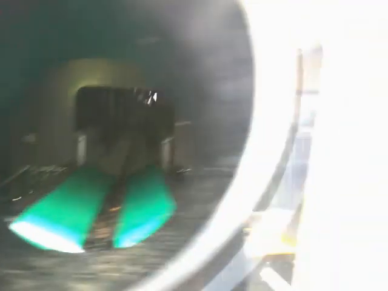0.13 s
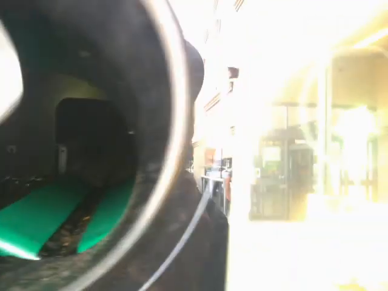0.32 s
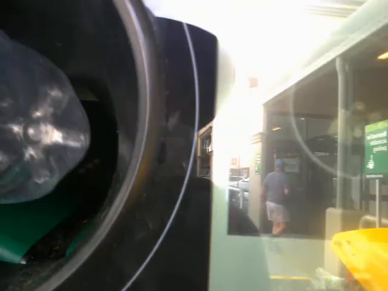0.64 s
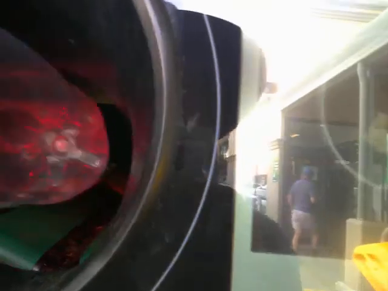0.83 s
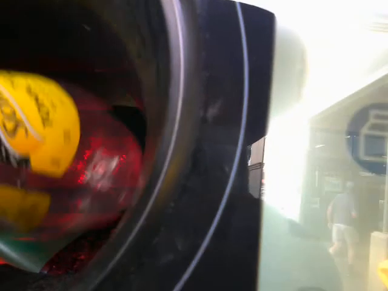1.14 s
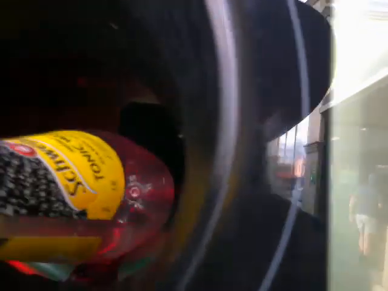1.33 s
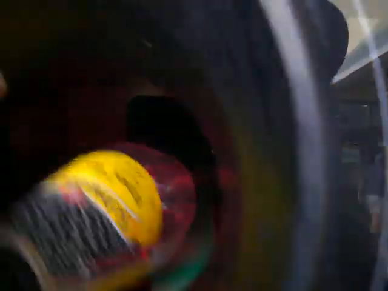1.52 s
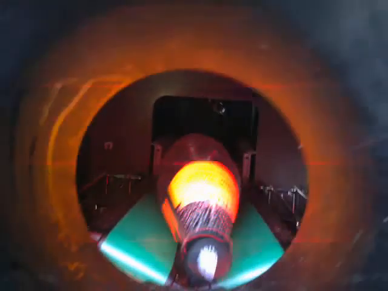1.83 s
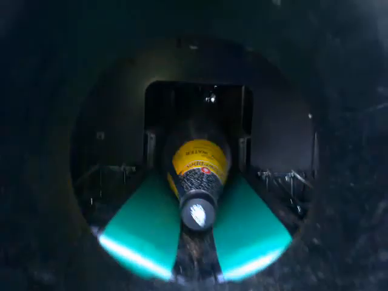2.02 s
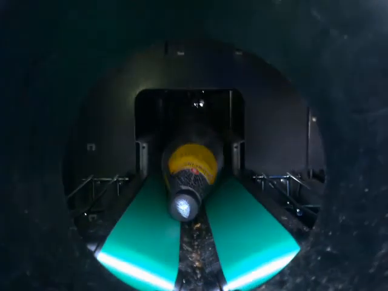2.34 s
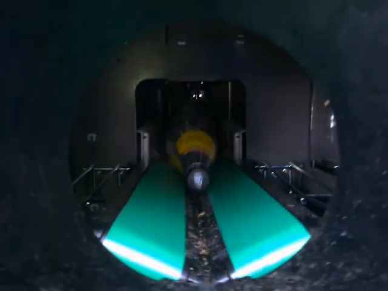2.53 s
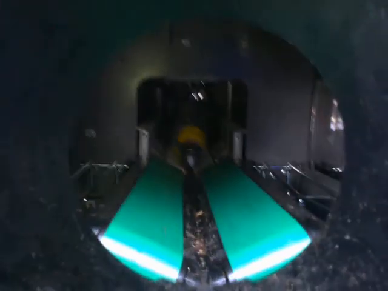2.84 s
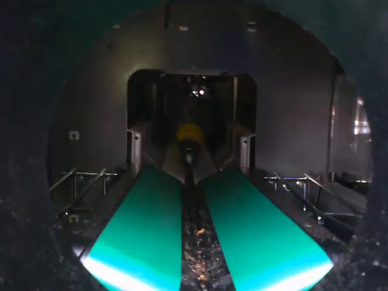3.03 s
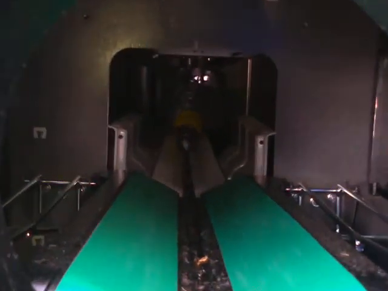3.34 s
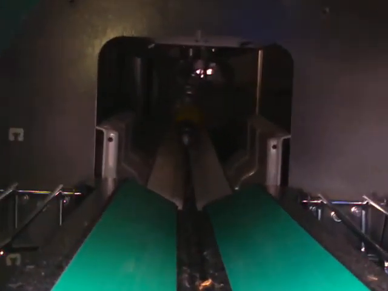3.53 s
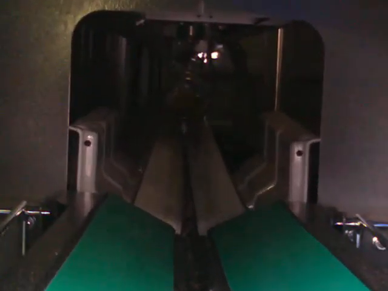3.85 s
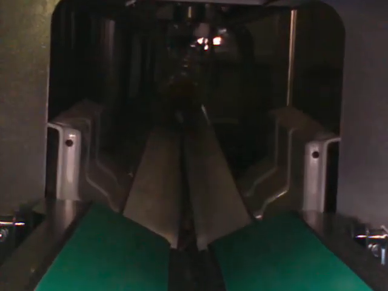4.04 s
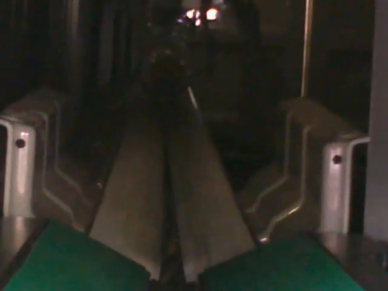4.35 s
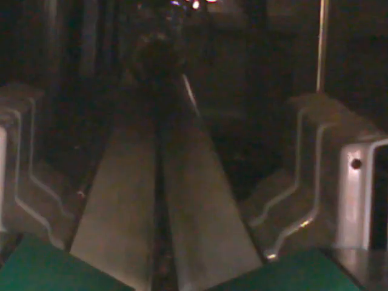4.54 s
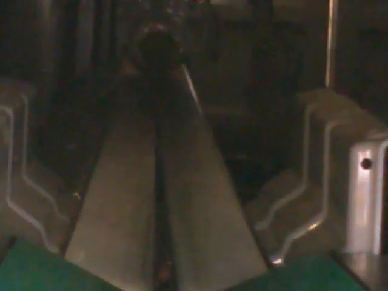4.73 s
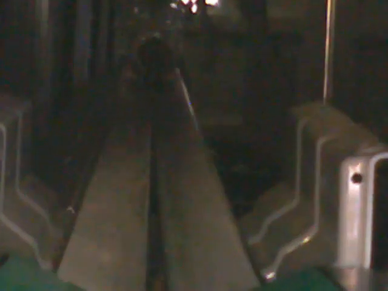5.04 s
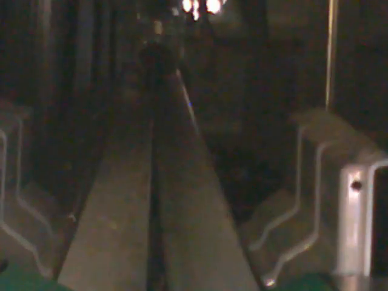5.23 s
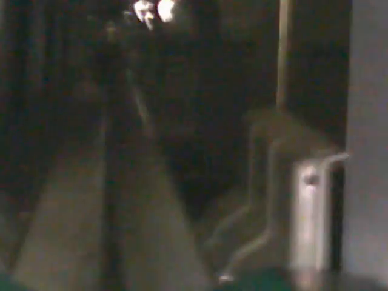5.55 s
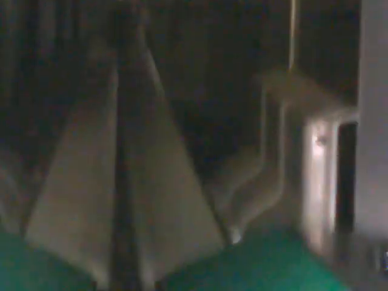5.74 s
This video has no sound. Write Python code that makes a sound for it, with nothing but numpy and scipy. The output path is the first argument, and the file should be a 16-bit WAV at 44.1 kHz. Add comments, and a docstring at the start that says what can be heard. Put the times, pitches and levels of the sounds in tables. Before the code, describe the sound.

Muffled handling thuds, then a hollow plastic bottle knocks sharply into a return machine and conveyor belts rumble, clatter and rattle it away.

```python
"""At a shop front, a plastic bottle is pushed into the mouth of a bottle return machine.
The hollow bottle and the mouth panel ring as decaying modes when it knocks; the thin wall crinkles in noise.
Belts start and carry it in: banded rumble and clatter, wavering drive tones, and rattles ringing the frame.
Fingers bump, tick and rub on the hand-held recorder, whose half-covered microphone muffles the treble.
Behind lie far traffic, a cooling fan and microphone hiss."""
import sys
import numpy as np
from scipy import signal
from scipy.io import wavfile

SR = 44100
rng = np.random.default_rng(int(sys.argv[2]) if len(sys.argv) > 2 else 0)


def store_wav(level_fs):
    """Save 16-bit WAV to argv[1]."""
    pcm = np.round(np.clip(np.atleast_2d(level_fs), -1, 1) * 32767)
    wavfile.write(sys.argv[1], SR, pcm.T.astype(np.int16))


def linear_from_db(decibels):
    """Turn decibels (scalar or array-like) into linear amplitude factors; 0 gives 1."""
    return 10 ** (np.asarray(decibels, float) / 20)


N = 260328


def rms_one(x):
    """Scale to rms 1."""
    return x / np.sqrt(np.mean(x ** 2) + 1e-20)


def in_time(rows):
    """Columns in dB at every sample, fading in before the first row and out after the last."""
    row_s, *columns = np.transpose(rows)
    row_s = np.r_[row_s[0] - .05, row_s, row_s[-1] + .05]
    t = np.arange(N) / SR
    return [np.interp(t, row_s, np.r_[-110, column, -110]) for column in columns]


def drift(rate_hz):
    """Slow random wander of rms 1: noise through two equal poles, computed every 40 samples."""
    pole = np.exp(-80 * np.pi * rate_hz / SR)
    noise = rng.standard_normal(N // 40 + 2002)
    slow = signal.lfilter([1], [1, -2 * pole, pole * pole], noise)[2000:]   # drop the settling
    return np.interp(np.arange(N) / 40, np.arange(len(slow)), rms_one(slow))


def ring(x, hz, t60_s):
    """A damped resonance: a unit click sets a sine of height 1 ringing."""
    pole = linear_from_db(-60 / (max(t60_s, .001) * SR))
    angle = 2 * np.pi * hz / SR
    return signal.lfilter([0, np.sin(angle)], [1, -2 * pole * np.cos(angle), pole * pole], x + 1e-18)


def band(x, low_hz, high_hz, order=2):
    """Butterworth band-pass."""
    return signal.sosfilt(signal.butter(order, [low_hz, high_hz], "band", fs=SR, output="sos"), x)


def soft(force, cut_hz, order=5):
    """A yielding contact, heard through the covered port, passes little treble."""
    return signal.sosfilt(signal.butter(order, cut_hz, fs=SR, output="sos"), force)


def add(out, start_s, sound, peak_db):
    """Lay a short sound into out with the given peak."""
    at = max(round(start_s * SR), 0)
    sound = sound[:N - at]
    out[at:at + len(sound)] += sound * linear_from_db(peak_db) / np.abs(sound).max()


def banded_noise(spectrum, patchy_db, rate_hz):
    """Third-octave noise bands that flicker partly together, partly alone; rms 1."""
    hz, db = np.transpose(spectrum)
    out, together, white = 0, drift(rate_hz), rng.standard_normal((2, N))
    edges_hz = hz[0] * 2 ** np.arange(0, np.log2(min(hz[-1], 19000) / hz[0]), 1 / 3)
    for k, (low_hz, high_hz) in enumerate(zip(edges_hz, edges_hz[1:])):
        level_db = np.interp(np.log(low_hz * high_hz) / 2, np.log(hz), db)
        flicker_db = patchy_db * (together + 0.45 * drift(rate_hz))
        out = out + linear_from_db(level_db + flicker_db) * band(white[k % 2], low_hz, high_hz, order=3)
    return rms_one(out)


def hum(hz, rms_db, width_hz):
    """A wavering tone: noise through a narrow resonance."""
    return linear_from_db(rms_db) * rms_one(ring(rng.standard_normal(N), hz, 2.2 / width_hz))


def strike(modes, contact, spread_db, tilt_db=0):
    """A contact force rings every mode, with strengths of its own for this blow."""
    gains = linear_from_db(np.transpose(modes)[1] + tilt_db + spread_db * rng.standard_normal(len(modes)))
    return sum(gain * ring(contact, hz, t60_s) for gain, (hz, _, t60_s) in zip(gains, modes))


def chatter(decay_s, touches_per_s, size=6000):
    """One firm touch, then uneven random ones dying away."""
    t = np.arange(size) / SR
    touches = rng.random(size) < touches_per_s / SR
    force = touches * rng.standard_normal(size) * np.exp(-t / decay_s)
    force[0] = 1.6
    return force


def bottle():
    """Hollow bumps on the chute, sharp knocks on the mouth, and the thin wall crinkling."""
    # Bumps on the chute. Each row: start in seconds, peak in dB ahead of the tunnel's tail.
    bump_rows = [(0.721, -30.5), (0.789, -13.5), (1.005, -31.5), (1.05, -22.5), (1.099, -20), (1.137, -28),
                 (1.217, -20.5)]
    # Modes of the hollow bottle. Each row: frequency in Hz, usual strength in dB, t60 in seconds.
    bottle_modes = [(167.6, 0.5, 0.27), (291.5, -5.5, 0.082), (352, 11.5, 0.07), (485, 6, 0.059),
                    (543, 7, 0.067), (728, 12, 0.011), (880, -7, 0.075), (1180, 2.5, 0.028),
                    (1470, -16, 0.17), (1733, -52, .08), (3360, -19, .03)]
    # Knocks on the mouth. Each row: start in seconds, peak in dB ahead of the tunnel's tail,
    # share of the free ring time, brightness in dB per octave.
    knock_rows = [(1.7543, -4, 0.62, -10.5), (1.8187, -9, 0.45, 1.5), (2.592, -21, 1.24, -6),
                  (2.906, -19.5, 1.1, -14), (2.958, -31, 0.99, -13)]
    # Modes of the mouth panel. Each row: frequency in Hz, usual strength in dB, free t60 in seconds.
    mouth_modes = [(780, -15, 0.021), (880, -7, 0.06), (904, 7.5, 0.088), (890, -11, 0.056),
                   (1340, -3, 0.056), (1760, 5, 0.024), (1780, -13, 0.068), (1970, -25, 0.064),
                   (2460, -27, 0.082), (2680, -19, 0.1), (2750, -8, 0.051), (4740, -8, .025)]
    out, click = np.zeros(N), np.eye(1, 6000)[0]
    for s, db in bump_rows:
        force = soft(chatter(.014, 500), cut_hz=2100, order=4)
        add(out, s + .0015, strike(bottle_modes, force, spread_db=2), db)
    for s, db, share, bright_db in knock_rows:
        modes = np.array(mouth_modes) * [1, 1, share]
        tilt_db = bright_db * np.log2(modes[:, 0] / 900)
        force = soft(click, cut_hz=2300, order=4)
        add(out, s, -strike(modes, force, spread_db=1, tilt_db=tilt_db), db)
    snaps = rng.standard_normal(N) * linear_from_db(2.0 * drift(60))
    high, low = band(snaps, 6500, 12000), band(snaps, 2500, 3300)
    crinkle = band(snaps, 4100, 5030, order=3) + linear_from_db(-18) * high + linear_from_db(-2) * low
    return tunnel(out) + crinkling() * rms_one(crinkle)


def tunnel(x):
    """The sheet-metal tunnel answers with a short dense tail, mostly in the upper middle."""
    t = np.arange(round(.2 * SR)) / SR
    tail = band(rng.standard_normal(len(t)), 1100, 5000)
    tail = tail * linear_from_db(-60 * t / .14) * (t > .003)   # t60 0.14 s
    return x + linear_from_db(-8) * signal.fftconvolve(x, tail / np.linalg.norm(tail))[:N]


def crinkling():
    """Level of the crinkle: a swell for each row over a faint bed that fades as the bottle slides away."""
    # Swells. Each row: time of peak in seconds, level in dB, rise and fall over 20 dB in seconds.
    swell_rows = [(0.724, -68.5, .013, .018), (0.798, -69, 0.034, 0.06), (1.07, -61.5, 0.04, 0.019),
                  (1.364, -60.5, 0.029, 0.01), (1.396, -66.5, 0.0066, 0.056), (1.446, -66, 0.054, 0.064),
                  (1.66, -74, 0.12, .08), (1.767, -51.5, 0.0065, 0.027), (1.822, -70, 0.016, .04)]
    slide_start_s, slide_start_db, fade_db_per_s = 0.94, -82.5, 4.0
    t = np.arange(N) / SR
    level = linear_from_db(slide_start_db - fade_db_per_s * (t - slide_start_s)) * (t > slide_start_s)
    for s, db, rise_s, fall_s in swell_rows:
        level = level + linear_from_db(db - 20 * np.where(t < s, (s - t) / rise_s, (t - s) / fall_s))
    return level


def belts():
    """Rollers rumble and the drive hums with them; loose parts clatter, the belt whirrs at the top."""
    # Belts running, their loudness rising and falling. Each row: time in seconds, rumble level in dB,
    # clatter level in dB.
    belt_rows = [(0.7, -48, -57.5), (0.95, -54, -60), (1.06, -44, -45), (1.2, -43, -50.5),
                 (1.45, -39.5, -43.5), (1.93, -45.5, -48.5), (2.15, -44.5, -48.5), (2.39, -47, -53.5),
                 (2.65, -41.5, -47.5), (2.92, -42.5, -45.5), (3.12, -47, -49.5), (3.47, -41, -40.5),
                 (3.72, -43.5, -46.5), (4.05, -39, -44), (4.28, -42.5, -44.5), (4.6, -40, -46),
                 (5.1, -43.5, -46), (5.42, -41, -42), (5.9, -48, -49.5)]
    # Whirr, heard best with the recorder inside the mouth. Each row: time in seconds, level in dB.
    whirr_rows = [(0.0, -61.5), (0.14, -65), (0.22, -95), (0.9, -87), (1.35, -87), (1.7, -83),
                  (1.95, -63.5), (2.35, -62.5), (2.65, -79.5), (3.0, -79), (3.45, -59), (4.8, -62),
                  (5.55, -65), (5.9, -77)]
    # Wavering drive tones. Each row: frequency in Hz, level in dB against the rumble.
    motor_rows = [(150.7, -7), (301.5, -9), (339.1, -11), (419.9, -12.5), (554.5, -30), (845.2, -10.5)]
    # Noise spectra. Each row: frequency in Hz, relative density in dB per Hz.
    rumble_spectrum = [(15, -46), (25, -24), (155, -3), (307, -7.5), (376, -23), (634, 0), (702, -25.5),
                       (800, -17), (1040, -47.5), (1760, -120)]
    clatter_spectrum = [(320, -35), (550, 5), (647, 3.5), (718, -10.5), (835, 6.5), (1010, -4), (1190, 6),
                        (1730, 0.5), (2200, -18.5), (2860, -55), (4840, -120)]
    rumble_db, clatter_db = in_time(belt_rows)
    whirr_db, = in_time(whirr_rows)
    motor = sum(hum(hz, db, width_hz=16) for hz, db in motor_rows)
    rumble = linear_from_db(rumble_db) * (banded_noise(rumble_spectrum, patchy_db=1.35, rate_hz=36) + motor)
    clatter = linear_from_db(clatter_db) * banded_noise(clatter_spectrum, patchy_db=3.5, rate_hz=26)
    whirr = rms_one(band(rng.standard_normal(N), 1600, 3600))
    top = clatter + linear_from_db(whirr_db + 2.0 * drift(25)) * whirr
    edge = signal.cheby2(10, 30, 2830, fs=SR, output="sos")   # 30 dB down above 2830 Hz
    return rumble + signal.sosfilt(edge, top)


def rattles():
    """Each rattle is a short chatter into the frame, strongest near its own pitch, with a scuff of hiss."""
    # Louder rattles in the belt frame. Each row: start in seconds, peak in dB, favoured pitch in Hz.
    rattle_rows = [(1.03, -32, 1240), (1.343, -26, 880), (1.647, -26, 1060), (1.907, -33.5, 1780),
                   (1.92, -35.5, 1770), (1.986, -33, 1340), (2.13, -30, 1100), (2.505, -30.5, 850),
                   (2.551, -25, 907), (2.98, -33, 870), (3.052, -22.5, 1670), (3.342, -27, 1096),
                   (3.403, -20, 1710), (3.454, -25, 1080), (3.563, -30, 1380), (3.733, -27, 1060),
                   (3.857, -25, 1710), (3.914, -23, 1480), (4.022, -27.5, 1070), (4.102, -30.5, 1290),
                   (4.418, -22, 1120), (4.553, -25.5, 1410), (4.702, -24, 1140), (4.816, -29.5, 805),
                   (4.923, -26, 1710), (5.04, -28, 1080), (5.24, -27, 1720), (5.266, -22.5, 1710),
                   (5.321, -23, 1090)]
    # Modes of the belt frame. Each row: frequency in Hz, usual strength in dB, t60 in seconds.
    frame_modes = [(816, -4, 0.078), (924.4, -1.5, 0.099), (1107, -8, 0.17), (1201, 7, 0.028),
                   (1350, -1, 0.094), (1476, 1, 0.073), (1710, 0.5, 0.055), (1698, 4.5, 0.015),
                   (2212, 3.5, 0.032), (2770, -23.5, 0.073), (2900, -39, .08)]
    # Brighter scuffs of plastic on the belts. Each row: start in seconds, peak in dB, centre in Hz.
    scuff_rows = [(1.92, -55.5, 3300), (1.973, -56.5, 2900), (2.12, -71, 4800), (2.495, -65, 4500),
                  (2.55, -56, 4500), (3.052, -59.5, 4000), (3.338, -61.5, 3900), (5.262, -53.5, 3900),
                  (5.483, -75, 4200)]
    hiss_db, hiss_hz = -49, 4200   # hiss peak against the rattle's
    out, t = np.zeros(N), np.arange(6000) / SR
    rows = rattle_rows + teeth()
    for s, db, hz in rows:
        near_db = -5.0 * np.abs(np.log2(np.array(frame_modes)[:, 0] / hz))
        force = soft(chatter(0.017, 1500), cut_hz=1900)
        add(out, s, strike(frame_modes, force, spread_db=3, tilt_db=near_db), db)
    hisses = [(s, db + hiss_db, hiss_hz) for s, db, hz in rows]
    for s, db, hz in scuff_rows + hisses:
        scuff = band(rng.standard_normal(len(t)), hz / 1.27, hz * 1.15)
        add(out, s, scuff * np.sqrt(t) * np.exp(-(t / 0.021) ** 2), db)
    return out


def teeth():
    """Every tooth of the drive wheel shakes the frame a little: rattle rows, each with its own pitch."""
    # Nine teeth in turn. Each entry: usual peak in dB.
    tooth_db = [-44, -42, -48, -46.5, -37, -38, -38.5, -37, -46.5]
    first_s, last_s, period_s = 1.034, 5.86, .0564
    spread_db, jitter_s = 2.2, .003
    s = np.arange(first_s, last_s, period_s)
    late, strong, pitch = rng.standard_normal((len(s), 3)).T
    db = np.resize(tooth_db, len(s)) + spread_db * strong
    return list(zip(s + jitter_s * late, db, 1150 * 2 ** (.3 * pitch)))


def handling():
    """Bumps swing the diaphragm, the casing ticks, dragging skin slips in dense clicks."""
    # Fingers bump the recorder. Each row: start in seconds, peak in dB, swing in Hz, t60 in seconds,
    # push 1 or pull -1.
    thump_rows = [(0.014, -29.5, 86, 0.058, 1), (0.0565, -5, 105, 0.017, 1), (0.07, -7.5, 94, 0.051, -1),
                  (0.095, -22.5, 266, 0.049, 1), (.134, -22.5, 261, 0.05, -1),
                  (2.214, -17.5, 77.5, 0.045, -1), (2.383, -29.5, 85, 0.13, -1),
                  (2.4, -22.5, 72, 0.085, -1), (2.422, -20.5, 147, 0.047, 1), (2.45, -25.5, 71, 0.056, -1),
                  (2.669, -25.5, 96, 0.066, -1), (2.828, -20, 130, 0.044, -1), (2.845, -9, 93, 0.054, 1),
                  (2.879, -14.5, 104, 0.017, -1), (2.9106, -7.5, 98, 0.025, 1),
                  (2.9332, -9.5, 93, 0.009, 1), (5.53, -4, 100.7, 0.032, 1), (5.552, -23, 142, 0.12, 1),
                  (5.576, -10, 68.6, 0.0095, 1), (5.598, -26, 244, 0.11, 1), (5.618, -22.5, 247, 0.079, -1),
                  (5.697, -9.5, 86, 0.018, -1), (5.746, -24, 128, 0.031, -1)]
    # Hard ticks, on the casing or where the bottle meets the chute. Each row: start in seconds,
    # peak in dB, ring in Hz, treble peak in dB, t60 in cycles of the ring.
    tick_rows = [(0.008, -30.5, 1760, -65, 20), (0.03, -20.5, 1500, -47.5, 1.5),
                 (0.055, -17.5, 947, -40.5, 7.2), (0.074, -3.5, 1050, -45.5, 8),
                 (0.0745, -25, 1500, -34, 4.1), (0.79, -22.5, 1500, -45, 32), (1.102, -40, 880, -51, 4.8),
                 (1.215, -38, 1220, -60, 6), (1.755, -24, 921, -31, 1), (2.213, -29, 1300, -64, 17),
                 (2.29, -21.5, 2100, -60.5, 6.8), (2.301, -16, 1820, -57.5, 1.4),
                 (2.359, -14.5, 929, -52.5, 0.74), (2.385, -15.5, 1600, -61.5, 6.9),
                 (2.403, -18, 1030, -47.5, 4), (2.671, -11, 918, -39.5, 2.1), (2.827, -5, 902, -36.5, 3.7),
                 (2.844, -4, 900, -38.5, 2.9), (2.8465, -7.5, 700, -43, 0.72),
                 (2.879, -29, 1300, -55.5, 2.4), (2.910, -4, 1100, -42.5, 0.95),
                 (2.9336, -11.5, 1300, -53, 0.65), (5.503, -19, 943, -44.5, 1.2),
                 (5.53, -13, 1500, -51, 1.5), (5.533, -14, 939, -48.5, 1.8), (5.555, -8, 902, -31.5, 0.87),
                 (5.575, -22, 910, -43, 3.5), (5.699, -22.5, 1180, -51.5, 5), (5.722, -22, 1540, -62, 12),
                 (5.744, -24.5, 1520, -65, 4.8)]
    # Skin drags over the casing. Each row: start in seconds, length in seconds, peak in dB,
    # centre in Hz, treble gain in dB.
    rub_rows = [(0.024, 0.064, -24.5, 850, -33), (0.065, 0.016, -11, 870, -28),
                (0.084, 0.021, -40, 1190, -35.5), (2.396, 0.054, -21, 1574, -31),
                (2.827, 0.0093, -21.5, 875, -36), (2.838, 0.016, -19.5, 1000, -22),
                (2.857, 0.017, -35, 1200, -26), (2.915, 0.013, -32, 860, -41),
                (5.538, 0.042, -24.5, 806, -44.5), (5.565, 0.016, -13, 980, -34),
                (5.699, 0.057, -33, 1500, -24.5)]
    out, click = np.zeros(N), np.eye(1, 6000)[0]
    for s, db, hz, t60_s, way in thump_rows:
        shove = signal.lfilter([1, -1], [1, -.96], click)   # a quick shove starts the swing
        push = soft(shove, cut_hz=1380, order=3)
        casing = linear_from_db(-18.5) * ring(push, 299.0, 0.012)   # the case flexes briefly
        add(out, s, way * (ring(push, hz, t60_s) + casing), db)
    for s, db, hz, treble_db, cycles in tick_rows:
        add(out, s + .001, -ring(soft(click, cut_hz=2380), hz, cycles / hz), db)
        crack = chatter(0.0003, 12000, size=600)
        crack = band(crack, 1600, 5500, order=3) + linear_from_db(-20) * band(crack, 7100, 15000, order=1)
        add(out, s + .0012, crack, treble_db)
    for s, length_s, db, hz, treble_db in rub_rows:
        t = np.arange(round(length_s * SR)) / (length_s * SR)   # 0 to 1 over the drag
        slips = (rng.random(6000) < 2500 / SR) * rng.laplace(size=6000)   # uneven, a few of them hard
        slips[:len(t)] *= np.sin(np.pi * t) ** .5
        slips[len(t):] = 0
        rasp = band(slips, 3300, 5020, order=3)
        drag = soft(band(slips, hz / 4, hz * 1.5), cut_hz=3000, order=4)
        add(out, s, drag + linear_from_db(treble_db) * rasp, db)
    return out


def street():
    """Far traffic as banded noise, and a cooling fan as a wavering tone."""
    # Traffic spectrum. Each row: frequency in Hz, relative density in dB per Hz.
    street_spectrum = [(15, -35.5), (25, -1.5), (102, 9.5), (178, -0.5), (352, 2), (397, -4), (569, -10),
                       (629, -6.5), (1460, -8.5), (2560, -46), (3000, -42), (3900, -67.5), (6600, -120)]
    traffic_db, fan_hz, fan_db = -52, 553, -60.5
    traffic = banded_noise(street_spectrum, patchy_db=.4, rate_hz=8)
    return linear_from_db(traffic_db) * traffic + hum(fan_hz, fan_db, width_hz=17)


def scene():
    """Sum of all sources, as one channel."""
    return (belts() + rattles() + bottle() + handling() + street())[None]


def band_limit(x):
    """A steep low-pass at the top of the band."""
    return signal.sosfilt(signal.butter(12, 15800, fs=SR, output="sos"), x)


def record(dry):
    """The microphone adds its own faint hiss."""
    # Hiss spectrum. Each row: frequency in Hz, relative density in dB per Hz.
    hiss_spectrum = [(2500, -8), (4000, -9), (6000, -12), (10000, -14.5), (14000, -24), (15800, -16)]
    hiss_db = -89
    heard = dry + linear_from_db(hiss_db) * banded_noise(hiss_spectrum, patchy_db=2.5, rate_hz=8)
    return band_limit(heard)


dry = scene()
out = record(dry)
store_wav(out)
```